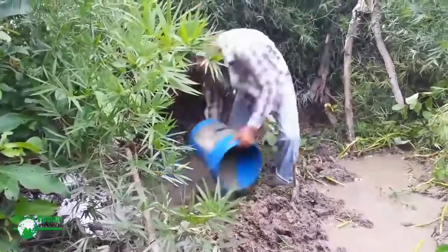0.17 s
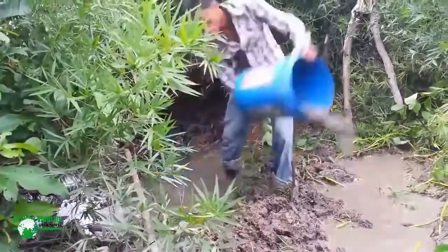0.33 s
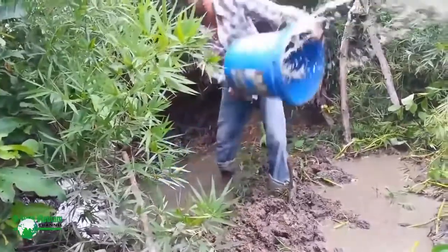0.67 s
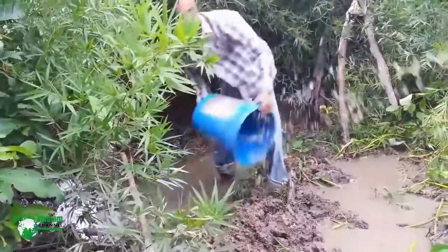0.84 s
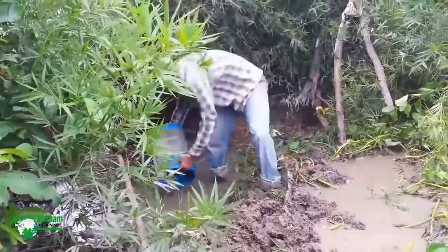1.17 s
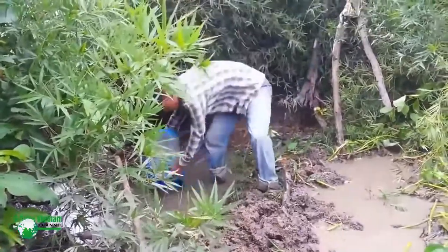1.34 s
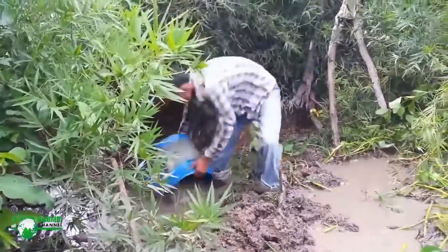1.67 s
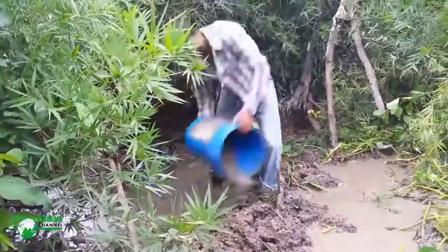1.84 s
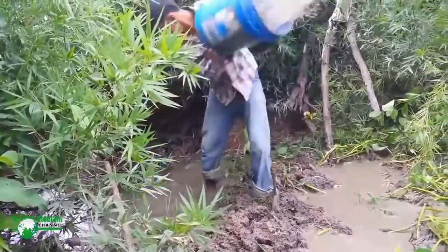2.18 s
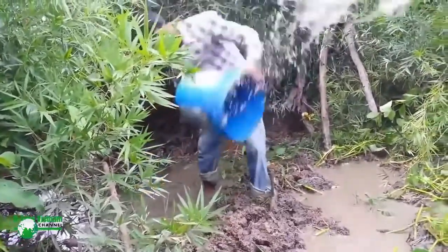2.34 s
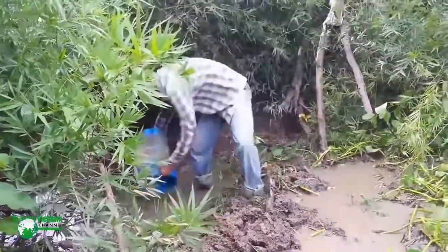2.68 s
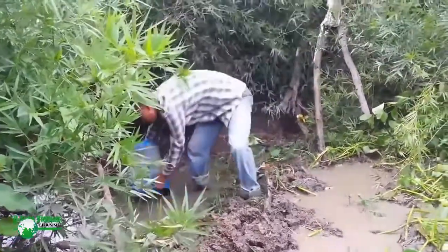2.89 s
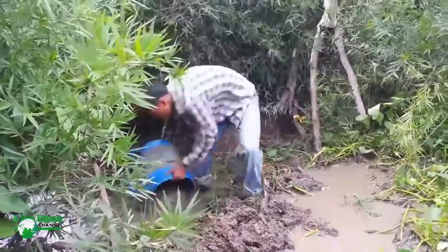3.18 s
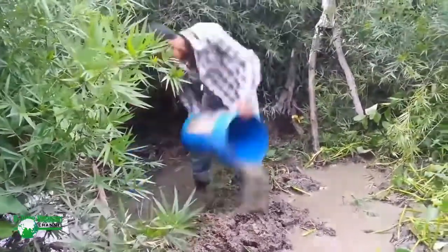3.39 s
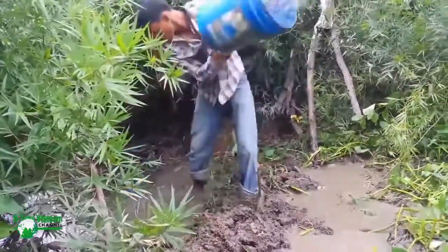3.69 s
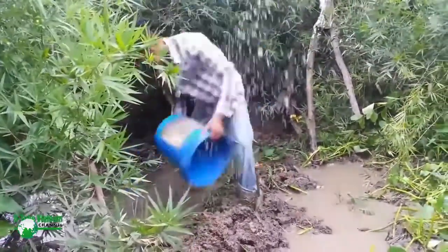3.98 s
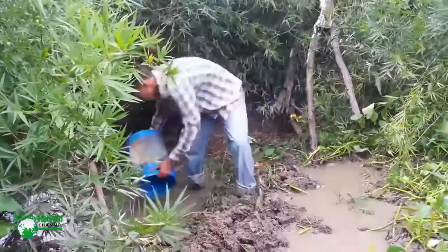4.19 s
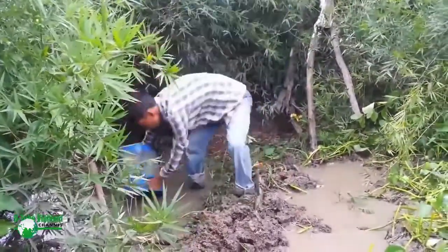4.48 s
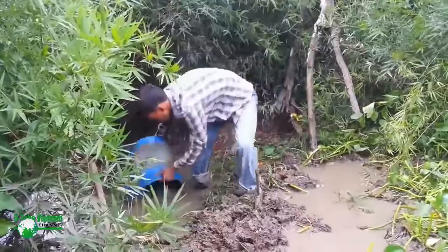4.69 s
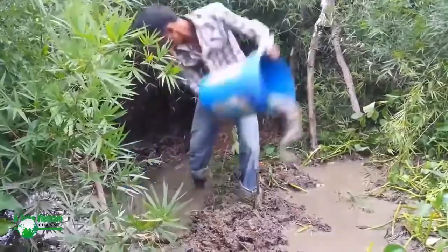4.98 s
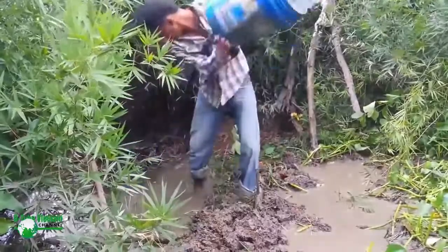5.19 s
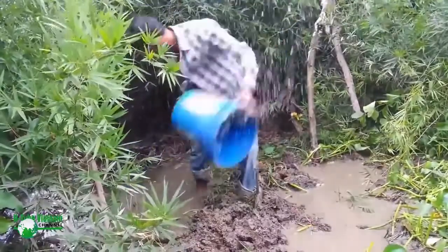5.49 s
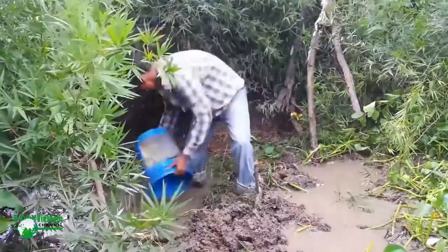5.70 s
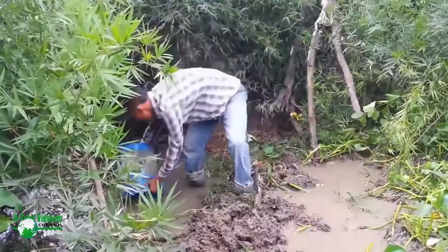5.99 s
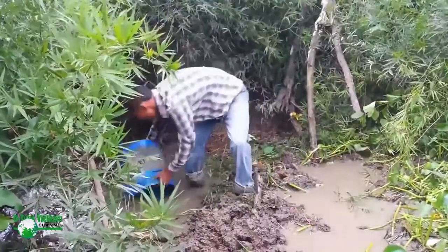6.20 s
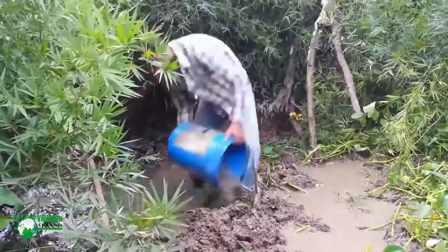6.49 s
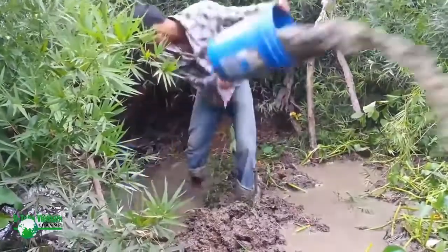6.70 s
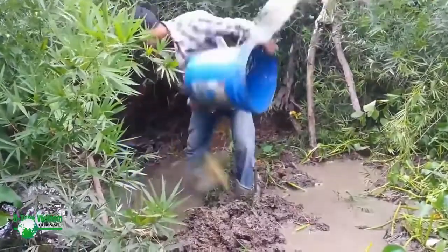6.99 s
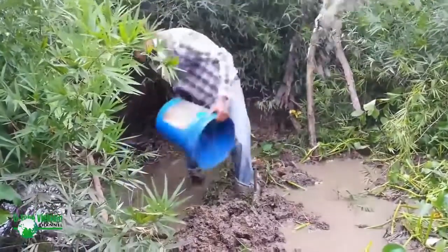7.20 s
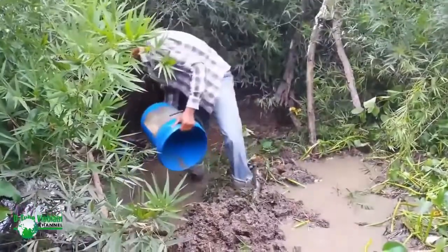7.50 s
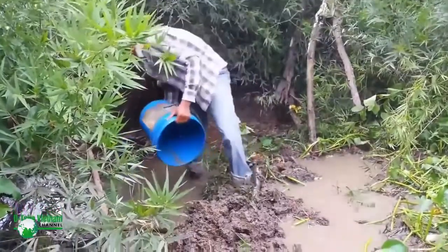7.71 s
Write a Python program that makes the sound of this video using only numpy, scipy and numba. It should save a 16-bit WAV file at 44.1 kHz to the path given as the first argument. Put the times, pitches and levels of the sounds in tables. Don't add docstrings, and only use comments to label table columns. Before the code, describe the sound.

Outdoors among bushes, a large plastic bucket scoops and flings muddy water in quick cycles of roughly a second and a half. Each cycle has sloshing and low gurgles, hard hollow slaps and plastic knocks, then a crisp shower pattering on leaves and mud. Stereo microphones a few metres away hear the bucket brighter on the left, over a very faint low rumble.

```python
import sys
import numpy as np
from scipy import signal
from scipy.fft import rfft, irfft, next_fast_len
from scipy.io import wavfile
from scipy.ndimage import uniform_filter1d
from numba import njit

SR = 44100
rng = np.random.default_rng(int(sys.argv[2]) if len(sys.argv) > 2 else 0)


def makeup_ratio(level_db):
    decades = np.asarray(level_db, float) / 20
    return 10 ** decades


def generate_wav(signal):
    frames = np.transpose(np.atleast_2d(signal))
    scaled = np.clip(frames, -1, 1) * 32767
    pcm = np.round(scaled).astype(np.int16)
    wavfile.write(sys.argv[1], SR, pcm)


N = 346163


def level(x, db):
    return x * makeup_ratio(db) / np.sqrt(np.mean(x ** 2))


def colour(x, points):
    hz, db = np.transpose(points)
    grid = np.maximum(np.arange(2049) * SR / 4096, 1)
    cepstrum = irfft(np.log(10) / 20 * np.interp(np.log(grid), np.log(hz), db))
    cepstrum[1:2048] *= 2
    cepstrum[2049:] = 0
    impulse = irfft(np.exp(rfft(cepstrum)))[None, :2048]
    return signal.fftconvolve(x, impulse, axes=1)[:, :N]


@njit
def svf(x, hz, width):
    y, band, low = np.empty(len(x)), 0., 0.
    for i in range(len(x)):
        g, k = np.tan(np.pi * hz[i] / SR), width / hz[i]
        v = (band + g * (x[i] - low)) / (1 + g * (g + k))
        band, low, y[i] = 2 * v - band, low + 2 * g * v, k * v
    return y


def resonate(x, hz, width):
    hz = hz + np.zeros(N)
    return np.array([svf(svf(c, hz, 1.45 * width), hz, 1.45 * width) for c in x])


@njit
def ring(start, hz, cycles, size, glide):
    out = np.zeros(N + 8192)
    for j in range(len(start)):
        n = min(int(7 * cycles[j] * SR / hz[j]), 8000)
        phasor = size[j] + 0j
        step = np.exp((2j * np.pi - 1 / cycles[j]) * hz[j] / SR)
        bend = np.exp(2j * np.pi * glide * hz[j] / SR / n)
        for i in range(n):
            out[start[j] + i] += phasor.imag * min(2 * i * hz[j] / SR, 1.)
            phasor *= step
            step *= bend
    return out[:N]


def arrivals(count, spread):
    left = rng.integers(0, N, count)
    offset = np.rint(spread * rng.standard_normal(count)).astype(int)
    return left, np.clip(left + offset, 0, N - 1)


def drops(scatter_db, spread, count):
    size = makeup_ratio(scatter_db * np.minimum(rng.exponential(size=count), 6))
    size = size * rng.choice([-1, 1], count)
    return level(np.array([np.bincount(at, size, N) for at in arrivals(count, spread)]), 0)


def bubbles(low_hz, octaves, cycles, glide, spread, count):
    pitch, loudness, length = rng.random((count, 3)).T
    hz = low_hz * 2 ** (octaves * pitch)
    size = makeup_ratio(11.6 * loudness)
    cycles = cycles * (.5 + length)
    return level(np.array([ring(at, hz, cycles, size, glide) for at in arrivals(count, spread)]), 0)


def flicker(rate, db):
    k = int(SR / rate)
    steps = np.repeat(rng.standard_normal(N // k + 1), k)
    return makeup_ratio(db * uniform_filter1d(steps, k)[:N])


def bursts(times, dbs, t60s, rise_s):
    env = np.zeros(N)
    for s, db, t60 in zip(times, dbs, np.clip(t60s, .004, .4)):
        first = int(s * SR)
        t = np.arange(min(int(t60 * SR), N - first)) / SR
        env[first:][:len(t)] += makeup_ratio(db - 60 * t / t60) * (1 - np.exp(-t / rise_s))
    return env


def swells(times, dbs, rises, falls, calm_db):
    roundness = 1.186
    coarse = np.arange(0, N, 64)
    t = coarse / SR - np.array(times)[:, None]
    rise, fall = np.clip(rises, .01, 3)[:, None], np.clip(falls, .01, 3)[:, None]
    span = np.where(t < 0, -rise, fall)
    swell_db = np.array(dbs)[:, None] - 20 * (t / span) ** roundness
    power = makeup_ratio(2 * calm_db) + makeup_ratio(2 * swell_db).sum(axis=0)
    return np.interp(np.arange(N), coarse, 10 * np.log10(power))


def ports(x, tilt, lead=((0, 0), (1, 0))):
    size = next_fast_len(N + 4096)
    hz = np.arange(size // 2 + 1) * SR / size
    tilt_hz, tilt_db = np.transpose(tilt)
    db = np.interp(np.log(hz + 1), np.log(tilt_hz), tilt_db)
    late = np.exp(-1j * np.interp(hz, *np.transpose(lead)))
    gains = np.array([makeup_ratio(0.29 * db), makeup_ratio(-.7 * db) * late])
    return irfft(rfft(x, size) * gains, size)[:, :N]


# start in seconds, peak in dB, cavity note in Hz, decay by 60 dB in seconds.
SURFACE_SLAPS = [(0.202, -10, 1180, 0.071), (0.449, -7.5, 1290, 0.073), (0.48, -14.5, 990, 0.094),
                 (2.153, -16, 960, 0.12), (2.366, -22, 1200, 0.075), (2.374, -8.5, 950, 0.059),
                 (3.354, -8, 1366, 0.059), (3.379, -19, 1370, 0.13), (3.579, -8.5, 1380, 0.076),
                 (3.603, -13, 1050, 0.077), (3.618, -7.5, 1015, 0.069), (3.755, -19.5, 970, 0.11),
                 (4.866, -8, 1620, 0.073), (5.156, -10, 930, 0.083), (5.381, -22, 910, 0.11),
                 (6.264, -25.5, 1010, 0.11), (6.431, -10, 1060, 0.068), (6.454, -13.5, 1050, 0.1),
                 (7.113, -16.5, 970, 0.081)]
# start in seconds, peak in dB, cavity in Hz, t60 in seconds.
WALL_KNOCKS = [(0.001, -23, 686, 0.21), (0.186, -22, 1700, 0.1), (0.223, -17.5, 1290, 0.067),
               (0.317, -26, 1160, 0.056), (0.73, -20, 953, 0.14), (0.852, -35, 890, 0.19),
               (0.883, -38.5, 880, 0.046), (2.051, -17.5, 710, 0.042), (2.138, -10.5, 930, 0.083),
               (2.4, -14, 820, 0.095), (3.873, -26.5, 1020, 0.14), (3.888, -23.5, 870, 0.076),
               (3.92, -23, 1370, 0.085), (4.635, -29, 810, 0.15), (4.698, -18.5, 1290, 0.058),
               (4.729, -20.5, 820, 0.14), (4.882, -16, 1090, 0.17), (4.99, -19, 900, 0.068),
               (4.998, -11, 1000, 0.082), (5.009, -6.5, 950, 0.047), (6.492, -10.5, 1010, 0.13),
               (7.09, -21, 1325, 0.13), (7.18, -29.5, 960, 0.051)]
# start in seconds, peak in dB, cavity in Hz, t60 in seconds.
RIM_SPLASHES = [(0.259, -23.5, 1470, 0.084), (0.364, -26, 1440, 0.29), (0.412, -16.5, 1170, 0.049),
                (1.158, -12.5, 1510, 0.032), (1.561, -34.5, 810, 0.11), (1.883, -29.5, 1150, 0.18),
                (1.965, -23, 960, 0.15), (2.113, -21, 950, 0.066), (2.119, -13, 955, 0.081),
                (2.891, -22, 880, 0.064), (3.411, -23, 920, 0.08), (3.479, -26.5, 835, 0.25),
                (4.293, -40.5, 668, 0.015), (4.953, -22, 1040, 0.08), (5.056, -23, 1380, 0.059),
                (5.115, -7.5, 940, 0.078), (5.136, -7, 950, 0.058), (6.149, -26, 1300, 0.2),
                (6.526, -22.5, 1270, 0.24), (6.567, -18, 1110, 0.12), (6.79, -12, 1020, 0.12)]
# start in seconds, peak in dB, cavity in Hz, t60 in seconds.
EMPTY_RATTLES = [(0.761, -24.5, 1080, 0.077), (2.184, -32, 815, 0.12), (5.18, -22, 1010, 0.12),
                 (5.393, -22.5, 884, 0.096), (5.416, -32, 790, 0.11), (5.488, -22.5, 1300, 0.041),
                 (5.52, -46, 894, 0.043), (6.817, -24, 1000, 0.07)]
# treble share in dB, hollow ring in dB.
BLOW_KINDS = [
    (-37, -9),
    (-7.5, -3),
    (4, -7.5),
    (-10, 4.5),
]


def blows():
    rows = []
    tables = (WALL_KNOCKS, SURFACE_SLAPS, RIM_SPLASHES, EMPTY_RATTLES)
    for table, (treble_db, hollow_db) in zip(tables, BLOW_KINDS):
        for s, peak_db, hz, t60 in table:
            rows.append((s, peak_db, treble_db, hz, hollow_db, t60))
    return np.transpose(sorted(rows))


# pitch in Hz, width in Hz, level in dB.
WALL_MODES = [(922, 95, -9), (1370, 760, -14), (2143, 120, -6), (2402, 140, -4), (2700, 126, -7),
              (3885, 120, -10.5), (5630, 310, -13)]


def slaps():
    s, peak_db, treble_db, cavity_hz, hollow_db, t60 = blows()
    volley = drops(scatter_db=3.5, spread=5, count=90000) * flicker(140, 2.0)
    last = np.maximum(np.searchsorted(s, np.arange(N) / SR) - 1, 0)

    low_body = bursts(s, peak_db, t60, 0.003)
    low_crack = bursts(s, peak_db - 1.0, 0.036 * t60, 0.00024)
    low = volley * (low_body + low_crack)
    cavity = makeup_ratio(9.0) * resonate(low, cavity_hz[last], 94) + makeup_ratio(5.0) * resonate(low, 1257, 1440)

    high_body = bursts(s, peak_db + treble_db, t60, 0.0015)
    high_crack = bursts(s, peak_db + treble_db - 2.0, 0.067 * t60, 0.00035)
    high = volley * (high_body + high_crack)
    gush = makeup_ratio(-5.0) * resonate(high, 2000, 1160) - makeup_ratio(-1.0) * resonate(high, 4150, 1920)

    rattle = volley * bursts(s, peak_db + hollow_db, 2.08 * t60, 0.0075)
    shift = rng.standard_normal((len(s), 2, len(WALL_MODES)))[last]
    wander = flicker(30, 0.31)
    wall = 0
    for k, (hz, width, db) in enumerate(WALL_MODES):
        mode_gain = makeup_ratio(db + 0.46 * shift[:, 0, k])
        mode_hz = hz * (1 + 0.037 * shift[:, 1, k]) * wander
        wall = wall + resonate(rattle * mode_gain, mode_hz, width)
    return cavity + gush + makeup_ratio(11.0) * wall * flicker(90, 2.4)


# start in seconds, peak in dB.
SMACKS = [(0.259, -9), (0.483, -5), (1.0983, -13), (2.1215, -12), (2.3772, -16), (2.7245, -28),
          (3.3545, -19), (4.2936, -9.5), (4.8652, -7), (5.1153, -7), (5.3965, -17), (6.151, -22),
          (6.4332, -17), (6.4922, -21), (7.1145, -19)]


def cracks():
    s, peak_db = np.transpose(SMACKS)
    push = np.bincount((s * SR).astype(int), makeup_ratio(peak_db), N) * np.ones((2, 1))
    body = resonate(push, 2160, 800) - resonate(push, 3700, 1400)
    return makeup_ratio(16.0) * (body + makeup_ratio(-18.0) * resonate(push, 8000, 6000))


def clear_notes(table, decay_s, db, glide):
    s, peak_db, hz = np.transpose(table)
    return ring((s * SR).astype(np.int64), hz, decay_s * hz, makeup_ratio(peak_db + db), glide)


# start in seconds, peak in dB, pitch in Hz.
HARD_PINGS = [(0.202, -10, 1390), (0.214, -13, 1119), (0.2589, -17.5, 2885), (0.2599, -9, 1740),
              (0.3637, -14.5, 3640), (0.4535, -9.5, 2140), (0.4814, -14, 2580), (0.7478, -21.5, 2310),
              (1.8882, -21, 4600), (2.0538, -19, 786), (2.1207, -12, 3870), (2.1207, -8, 2190),
              (2.1566, -10, 994), (2.1576, -10.5, 3980), (2.3761, -12, 3750), (2.3761, -8, 3020),
              (2.3771, -12.5, 2215), (3.303, -23, 3186), (3.3549, -12, 1320), (3.3559, -16, 4300),
              (3.3619, -10, 960), (3.5834, -6.5, 2145), (3.6183, -16, 2300), (3.6203, -11, 985),
              (4.2937, -17.5, 3000), (4.8654, -7.5, 4070), (4.8654, -3.5, 1593), (4.8664, -15, 3430),
              (4.8754, -13, 3180), (4.8784, -11, 1065), (4.8814, -15, 2700), (5.0101, -15, 882),
              (5.0111, -16, 2110), (5.1199, -11, 940), (5.1219, -9.5, 3980), (5.491, -28, 2700),
              (5.1398, -14, 2220), (5.1568, -10, 2799), (5.1727, -9, 2600), (5.3962, -15, 2130),
              (6.1505, -21, 2560), (6.2663, -22.5, 2560), (6.4329, -11.5, 3980), (6.4329, -8, 1550),
              (6.4369, -17, 3010), (6.4927, -11, 1080), (6.7901, -16, 2970), (6.7921, -9, 2145),
              (7.1143, -14.5, 3660), (7.1173, -16, 2660), (7.1213, -15.5, 930), (7.5843, -16.5, 2910)]


def pings():
    return clear_notes(HARD_PINGS, decay_s=0.0044, db=-3.0, glide=.04)


# start in seconds, peak in dB, pitch in Hz.
AIR_POCKETS = [(0.3143, -29, 1150), (0.3203, -33, 2310), (0.3751, -24, 2250), (0.453, -25, 1310),
               (0.7353, -33, 960), (0.857, -31.5, 904), (0.879, -28, 936), (1.0546, -35, 795),
               (1.8179, -38.5, 947), (1.8847, -32, 1150), (2.0593, -33, 2180), (2.1431, -15, 2400),
               (2.175, -20, 863), (2.3736, -16, 1270), (2.3776, -26, 1650), (2.4285, -23, 1240),
               (2.9952, -20, 1730), (3.7555, -23, 1235), (3.7604, -30, 956), (3.8862, -31, 1840),
               (3.8882, -24.5, 2350), (3.9281, -19.5, 1353), (3.937, -28, 2330), (4.2892, -38, 2200),
               (4.8809, -25, 1650), (5.0545, -20, 1870), (5.4247, -20, 2410), (5.4885, -31, 2067),
               (5.4895, -40, 950), (5.4915, -41, 1335), (5.6122, -43, 1000), (5.8886, -35, 1162),
               (5.8966, -34, 2540), (6.4553, -20, 1050), (6.4922, -7.5, 1440), (6.575, -16.5, 990),
               (6.71, -25, 1970), (6.7955, -16, 1679), (6.9243, -36, 2067), (7.1168, -33, 2130),
               (7.2246, -40.5, 807)]


def pockets():
    return clear_notes(AIR_POCKETS, decay_s=0.0097, db=-3.0, glide=.1)


# start in seconds, peak in dB, pitch in Hz.
LARGE_BUBBLES = [(0.76, -33, 915), (1.055, -26, 824), (1.612, -24, 1630), (1.97, -31, 950),
                 (1.993, -26, 1500), (2.01, -28, 1330), (2.054, -18, 656), (4.57, -27, 620),
                 (4.636, -27, 1400), (4.657, -19, 1430), (4.697, -23, 955), (4.705, -20, 1250),
                 (4.731, -24.5, 610), (4.75, -29, 1220), (4.766, -24, 800), (4.777, -28, 1600),
                 (5.21, -29, 1250), (6.1, -33, 730), (6.82, -24, 960), (6.84, -25, 780), (7.118, -16, 944)]


def blips():
    s, peak_db, hz = np.transpose(LARGE_BUBBLES)
    return ring((s * SR).astype(np.int64), hz, 6.2 + 0 * s, makeup_ratio(peak_db - 4.5), 0.58)


# loudest moment in seconds, slosh in dB, surge in dB, rise in seconds, fall in seconds.
BUCKET_STIRS = [(0.0, -38, -43, .1, 0.32), (.39, -39, -44, 0.13, 0.31), (1.06, -45, -50, 0.12, 0.7),
                (1.21, -39.5, -45.5, 0.17, 0.5), (1.63, -41, -49, 0.13, 0.1), (1.92, -45, -78, 0.1, 0.26),
                (2.06, -42, -49.5, 0.4, 0.43), (2.89, -49, -45.5, 0.31, 0.2),
                (3.04, -35, -41.5, 0.18, 0.31), (3.52, -37.5, -46, 0.22, .3), (3.6, -39, -45, 0.11, 0.32),
                (3.76, -41.5, -65, .5, 0.077), (4.47, -37, -55, 0.039, 0.64),
                (4.58, -42.5, -43.5, 0.45, 0.46), (5.06, -34.5, -42, 0.3, 0.41),
                (5.8, -56, -58, 0.17, 0.64), (6.12, -40, -46.5, 0.29, 0.69),
                (6.67, -34.5, -48, 0.27, 0.085), (6.82, -48, -51, 0.28, 0.45),
                (7.6, -44.5, -43.5, 0.24, 0.17), (7.69, -38, -46, 0.28, 0.094)]
# frequency in Hz, density in dB per Hz.
SLOSH_COLOUR = [(180, -8), (300, -11.5), (404, 2.5), (545, -68), (685, -4), (923, -4.5), (1520, 3.5),
                (2430, -0.5), (3140, -2), (3940, 4), (4360, 1.5), (5550, -39), (9000, -39), (19800, -120)]


def slosh():
    s, slosh_db, _, rise, fall = np.transpose(BUCKET_STIRS)
    db = swells(s, slosh_db, rise, fall, calm_db=-77)
    churn = drops(scatter_db=1.0, spread=3.8, count=60000)
    churn = churn + makeup_ratio(-7.5) * bubbles(605.4, 2.6, 7.4, 0.18, 6.7, count=4000)
    return level(colour(churn, SLOSH_COLOUR), 0) * makeup_ratio(db + 2.0) * flicker(60, 2.4)


# frequency in Hz, left minus right in dB.
POOL_TILT = [(400, 0), (1300, 0), (2500, 5), (5000, 5), (12000, -12)]


def bucket():
    return ports(slosh() + slaps() + cracks() + blips() + pings() + pockets(), POOL_TILT)


# start in seconds, peak in dB, main mode in Hz, t60 in seconds.
BOTTOM_THUMPS = [(0.001, -30, 140, 0.078), (0.209, -39.5, 268, 0.16), (0.404, -28, 158.6, 0.069),
                 (0.458, -42, 146, 0.17), (0.743, -43.5, 129, 0.25), (1.576, -38.5, 137.4, 0.15),
                 (1.931, -44.5, 229, 0.25), (2.131, -37, 138, 0.21), (2.388, -42.5, 135, 0.17),
                 (3.12, -20, 160, 0.069), (3.357, -28.5, 228.6, 0.13), (3.582, -43, 307, 0.16),
                 (3.891, -43.5, 148, 0.21), (4.633, -40, 200, 0.055), (4.659, -41, 201, 0.07),
                 (4.696, -27.5, 191, 0.074), (4.866, -20, 194.5, 0.084), (4.9, -29, 200, 0.095),
                 (4.998, -42, 207, .17), (5.114, -38, 132, 0.25), (5.38, -46, 150, 0.35),
                 (6.248, -31.5, 147, 0.1), (6.435, -26.5, 177, 0.093), (6.492, -23, 180, .05),
                 (6.499, -3, 176.7, 0.053), (6.5103, -6.5, 194.4, 0.055), (6.523, -7.5, 187, 0.042),
                 (6.555, -27, 215, 0.16), (6.634, -31.5, 242, 0.11), (6.799, -42.5, 143, 0.2),
                 (7.097, -46, 129.4, 0.27)]
# frequency ratio, level in dB.
BOTTOM_MODES = [(1, 4), (0.67, -7.5), (1.17, -3.5), (1.8, -8), (2.1, -16)]


def thumps():
    out = np.zeros(N)
    for s, peak_db, hz, t60 in BOTTOM_THUMPS:
        first = int(s * SR)
        t = np.arange(min(int(.4 * SR), N - first)) / SR
        fade = makeup_ratio(peak_db - 60 * (t / np.clip(t60, .03, .5)) ** 1.26)
        fade = fade * (1 - np.exp(-t / 0.0029))
        boom = sum(makeup_ratio(db) * np.sin(2 * np.pi * ratio * hz * t) for ratio, db in BOTTOM_MODES)
        out[first:][:len(t)] -= fade * boom
    return out


# start in seconds, peak in dB.
WATER_SHEETS = [(0.361, -6), (1.157, -9), (1.885, -16), (2.7228, -7), (2.886, -12), (2.8977, -8),
                (2.908, -9), (3.352, -14), (4.2926, -15), (4.8644, -10), (5.119, -13), (6.4333, -14)]
# frequency in Hz, density in dB per Hz.
SPRAY_COLOUR = [(180, -37), (300, 1.5), (468, -14), (708, -9), (1030, -10.5), (1970, -10.5), (3450, -6.5),
                (5050, 1.5), (7020, -7), (14200, -11.5), (14800, -34), (15500, -48)]


def spray(db, mist_db):
    s, peak_db = np.transpose(WATER_SHEETS)
    patter = drops(scatter_db=1.5, spread=13, count=120000)
    patter = patter + makeup_ratio(-6.0) * bubbles(1817, 2.9, 14.0, 0.264, 12, count=6000)
    patter = patter * flicker(170, 0.93)
    patter = patter + makeup_ratio(-14.5) * bubbles(2460, 1.65, 3.6, 0.099, 9.7, count=1500)
    patches = 0.77 * patter
    for hz in (1300., 2600., 5000., 8500., 12500.):
        patches = patches + resonate(patter, hz, 1.4 * hz) * flicker(40, 3.04)
    wash = level(colour(patches, SPRAY_COLOUR), 0)
    mist_band = signal.butter(2, 6800, "high", fs=SR, output="sos")
    mist = signal.sosfiltfilt(mist_band, wash)
    flow = makeup_ratio(db + 2.5) * flicker(39, 0.61)
    sheets = bursts(s, peak_db - 15.5, 0.046 + 0 * s, 0.0011)
    return (wash + (makeup_ratio(mist_db) - 1) * mist) * (flow + sheets)


# loudest moment in seconds, level in dB, rise in seconds, fall in seconds, fine mist in dB.
THROWN_SHOWERS = [(0.0, -31, .1, 0.23, 0), (.45, -33, 0.17, 0.14, -2.5), (.7, -45.5, 0.74, 0.23, -2.5),
                  (1.04, -32.5, 0.066, 0.2, 2.5), (1.15, -25, 0.12, 0.2, -1.5),
                  (1.43, -39, 0.59, 0.18, 3.5), (1.83, -51.5, 0.74, 0.5, -4), (2.26, -37.5, 0.56, 0.18, -1),
                  (2.74, -33, 0.046, 0.56, 3), (2.88, -28, 0.31, 0.27, -2.5), (3.1, -33, 0.43, 0.25, 1.5),
                  (3.3, -51, .1, .08, -24), (3.48, -31.5, 0.14, 0.13, -1), (3.65, -36.5, 0.11, 0.38, -1),
                  (4.43, -29.5, 0.33, 0.53, 0.5), (4.68, -36.5, 0.53, 0.15, -5), (4.82, -45, .08, .08, -20),
                  (5.05, -27, 0.21, 0.088, -2.5), (5.16, -30.5, 0.28, 0.03, -2),
                  (5.3, -34.5, 0.3, 0.15, -1.5), (5.7, -44, 0.14, 1, 3), (5.99, -39.5, 0.32, 0.18, 4.5),
                  (6.27, -34.5, 0.47, 0.16, 0.5), (6.58, -28, 0.13, 0.04, -1), (6.75, -42.5, .3, 0.36, 0),
                  (6.95, -42.5, 0.13, 0.3, 2.5), (7.5, -29, 0.12, 0.15, 0), (7.63, -24, 0.26, 0.13, -2.5)]
# loudest moment in seconds, level in dB.
RIM_GUSHES = [(.26, -37), (0.371, -29), (1.968, -29), (2.38, -39), (2.91, -26.5), (3.59, -29.5),
              (5.5, -49.5), (6.06, -28), (6.64, -28.5), (7.341, -37.5)]


def rain():
    gushes = [(s, db, 0.061, 0.077, 0) for s, db in RIM_GUSHES]
    top, db, rise, fall, mist_db = np.transpose(THROWN_SHOWERS + gushes)
    drizzle_db = -63
    flow_db = swells(top, db, rise, fall, drizzle_db)
    fine_db = swells(top, db + mist_db, rise, fall, drizzle_db)
    return spray(flow_db, fine_db - flow_db)


# start in seconds, peak in dB.
FAT_DROPS = [(1.0011, -25), (1.0231, -24), (1.035, -19), (1.0854, -18), (1.0984, -11), (1.1298, -12),
             (1.5574, -30), (1.69, -28.5), (1.806, -25.5), (2.584, -20), (2.6377, -15), (2.6454, -25),
             (2.6683, -25), (2.701, -14.5), (2.7614, -19), (2.8094, -20), (2.8335, -14), (2.9736, -17),
             (3.0212, -12), (3.4131, -23), (3.476, -14), (3.6566, -12), (4.3271, -24), (4.406, -9),
             (4.4508, -12), (5.248, -17.5), (5.925, -17.5), (6.0484, -19), (6.352, -25), (6.8174, -18)]


def spatters():
    s, peak_db = np.transpose(FAT_DROPS)
    crackle = resonate(drops(scatter_db=3.0, spread=8, count=50000), 4800, 1600)
    return level(crackle, 0) * bursts(s, peak_db - 8.0, 0.043 + 0 * s, .0004)


# frequency in Hz, density in dB per Hz.
SURGE_COLOUR = [(12, -21), (20, 17), (87, -7), (175, -4), (270, -3), (380, 1.5), (475, 9.5), (700, 16),
                (910, -15), (1540, -120)]


def surge():
    s, _, surge_db, rise, fall = np.transpose(BUCKET_STIRS)
    db = swells(s, surge_db, rise, fall, calm_db=-67)
    heave = drops(scatter_db=-1.0, spread=25.0, count=30000)
    heave = heave + makeup_ratio(4) * bubbles(114.4, 1.79, 1.87, 0.25, 32.7, count=2500)
    return level(colour(heave, SURGE_COLOUR), 0) * makeup_ratio(db + 1.5) * flicker(25, 3)


# frequency in Hz, density in dB per Hz.
WOODS_COLOUR = [(15, -47), (25, 6), (70, 13), (129, 4.5), (300, 1.5), (500, -9), (1200, -5.5), (3000, -13),
                (6000, -40)]


def woods():
    stirrings = drops(scatter_db=0.0, spread=27, count=200000)
    return level(colour(stirrings, WOODS_COLOUR), -58.5 - 2.0)


def scene():
    return bucket() + thumps() + rain() + spatters() + surge() + woods()


def roll_off(x):
    return signal.sosfilt(signal.butter(12, 15700, fs=SR, output="sos"), x)


# frequency in Hz, left minus right in dB.
PORT_TILT = [(60, -0.5), (110, 0.5), (200, 1.0), (380, 1.0), (700, 2.0), (1290, 4.5), (2380, 10.5),
             (4400, 12.5), (8120, 1.5), (15000, -1.0)]
# frequency in Hz, lead of the left port in radians.
PORT_LEAD = [(0, 0), (950, 1.1), (1380, 1.9), (2330, 6.5), (2930, 7.4), (3790, 10.8), (4740, 12.4),
             (6550, 14.3), (8100, 22.5), (10200, 26.4), (12400, 35.9), (13400, 38.1), (14000, 35.3),
             (15200, 32.4)]


def record(dry):
    rounded = np.tanh(0.95 * ports(dry, PORT_TILT, PORT_LEAD)) / 0.87
    low_cut = signal.butter(2, 46, "high", fs=SR, output="sos")
    top_cut = signal.ellip(10, .2, 80, 15600, fs=SR, output="sos")
    mix = signal.sosfilt(top_cut, signal.sosfilt(low_cut, rounded))
    return roll_off(mix)


dry = scene()
out = record(dry)
generate_wav(out)
```